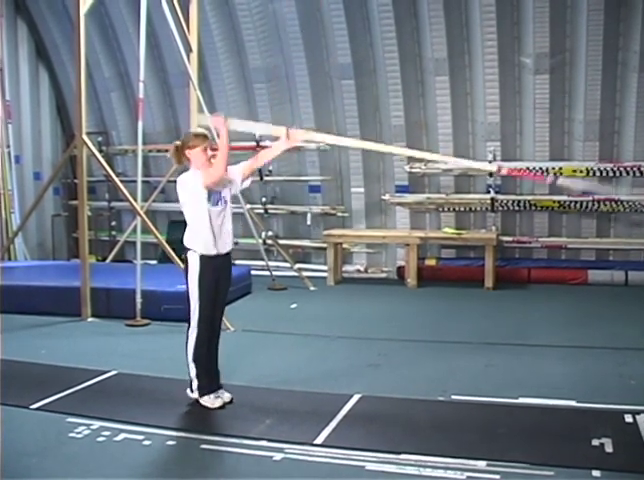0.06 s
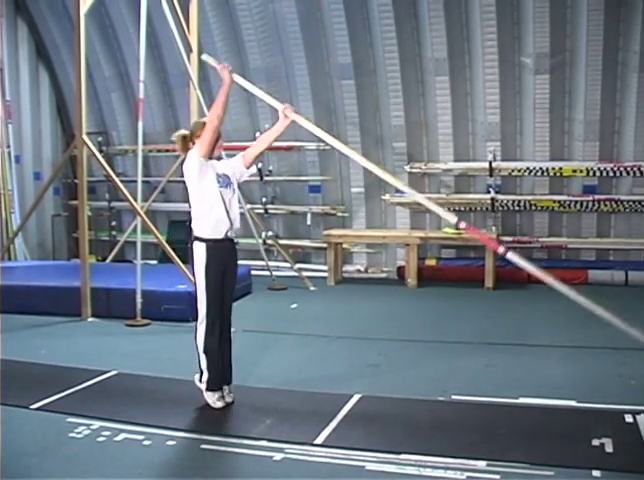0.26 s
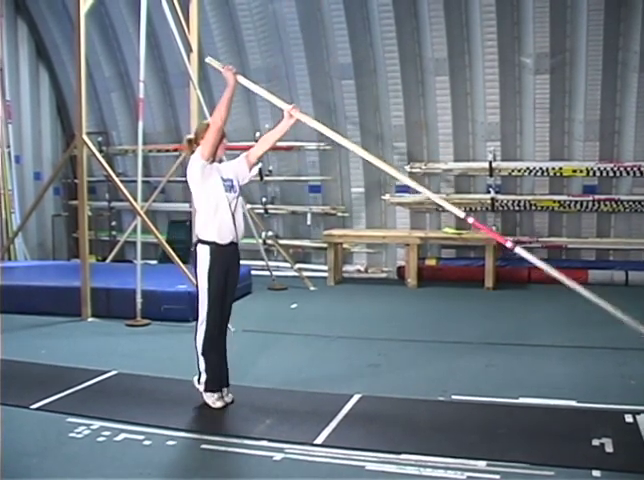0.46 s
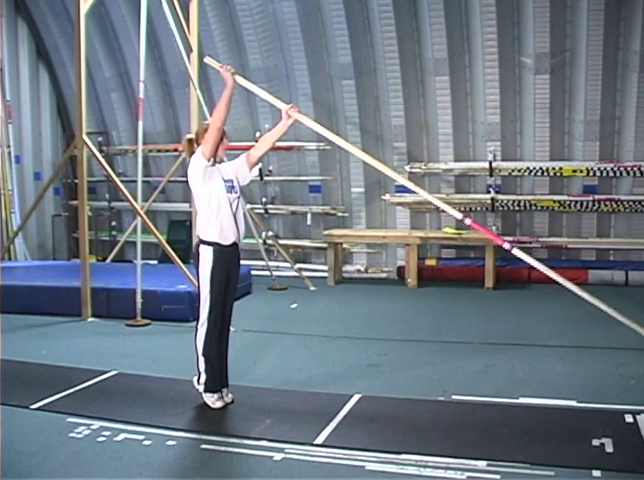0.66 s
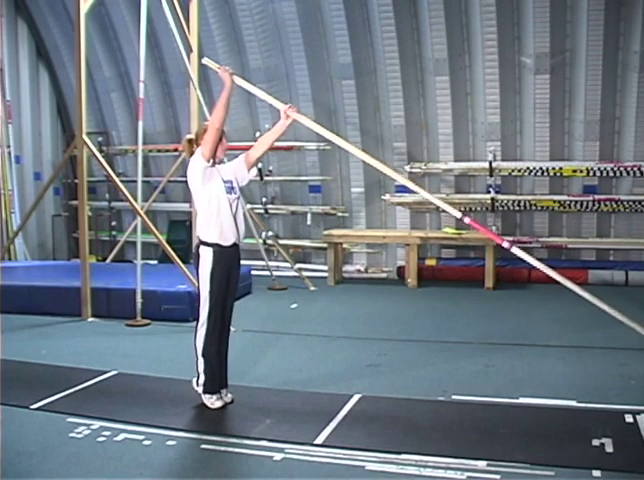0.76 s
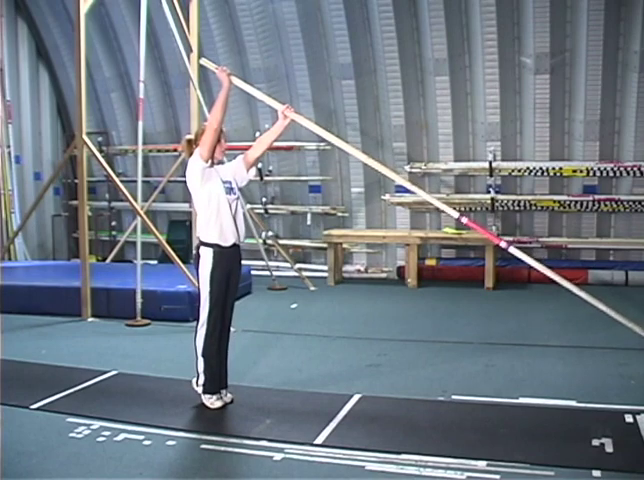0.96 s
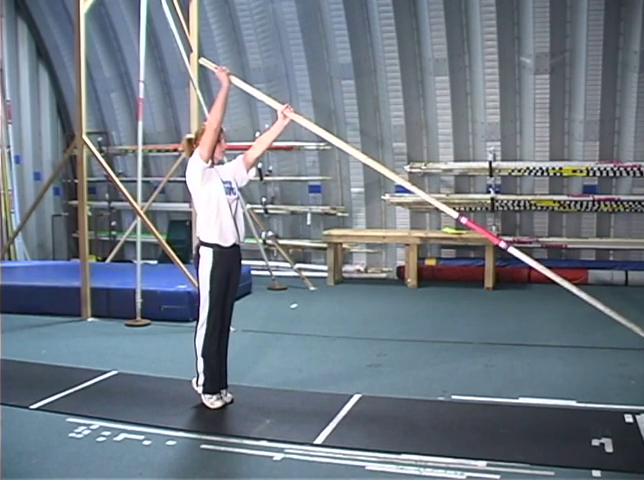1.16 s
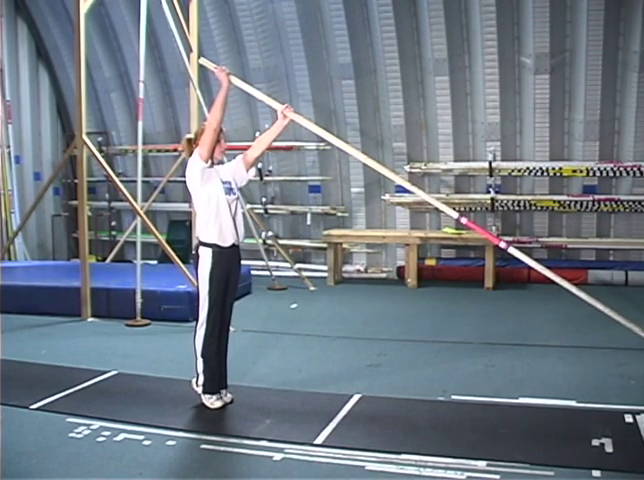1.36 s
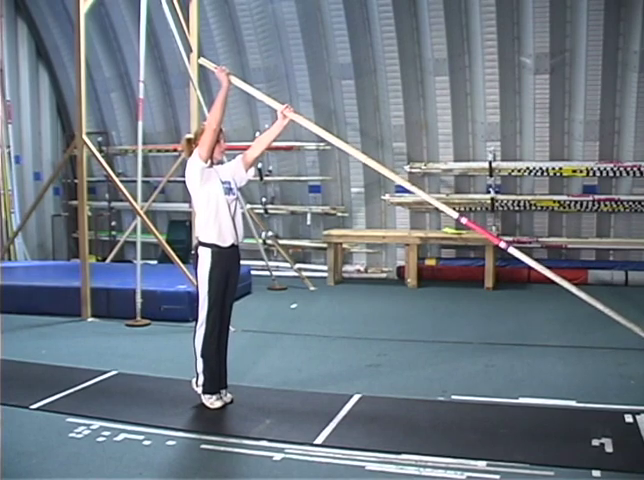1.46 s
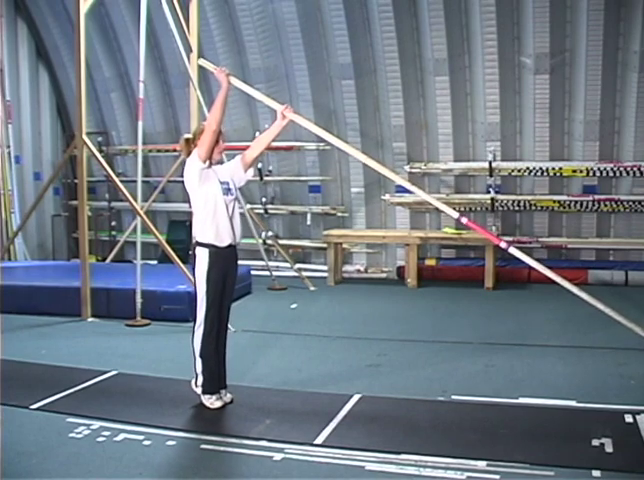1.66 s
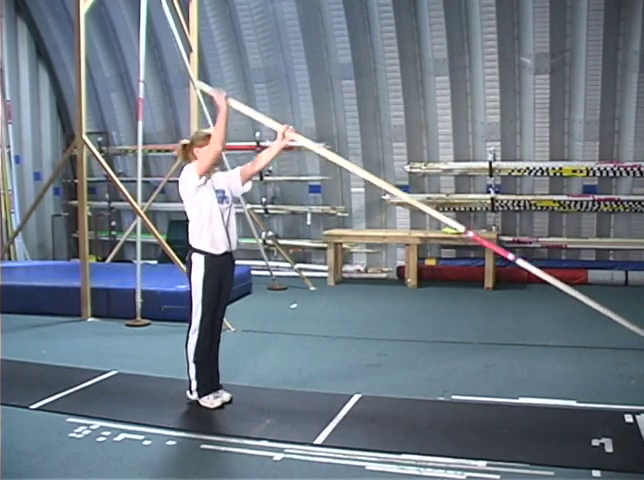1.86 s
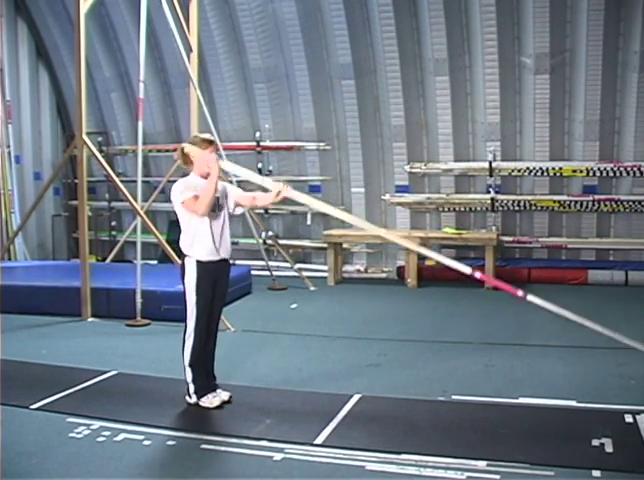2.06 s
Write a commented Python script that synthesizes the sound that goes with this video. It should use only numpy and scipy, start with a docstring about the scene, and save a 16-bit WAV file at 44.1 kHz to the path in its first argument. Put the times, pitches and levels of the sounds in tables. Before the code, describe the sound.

A vaulting pole slaps hard onto a runway, briefly overloading the microphone, and lands again more softly. Its ring fades through an echoing sports hall. Near the end come faint grip creaks and a light scrape.

```python
"""Faint rubbing, a creak and a soft footfall over the air of an arched sports hall: a long vaulting
pole is swung down. It slaps the runway and lands again, softer, after one bounce. Each blow is a
crack, a knock of the floor and the ring of the pole, and the hall rings on; the slap overloads the
microphone. At the end the pole is drawn back: it creaks and its tip scrapes over the floor."""
import sys
import numpy as np
from scipy import signal
from scipy.io import wavfile

SR = 44100
rng = np.random.default_rng(int(sys.argv[2]) if len(sys.argv) > 2 else 0)


def output_pcm(signal):
    """Save a mono or channel-first signal as 16-bit PCM at the path in sys.argv[1].

    Samples are clipped to [-1, 1] before scaling.
    """
    pcm = np.clip(np.atleast_2d(signal).T, -1, 1) * 32767
    wavfile.write(sys.argv[1], SR, np.round(pcm).astype(np.int16))


N = 92610
T = np.arange(N) / SR


def from_db(db):
    """Decibels to gain."""
    return 10 ** (np.asarray(db) / 20)


def rms_one(x):
    """Scale to unit rms."""
    return x / np.sqrt(np.mean(x ** 2) + 1e-20)


def at_hz(points, hz):
    """Read a table on a log-frequency axis."""
    points_hz, values = np.transpose(points)
    return np.interp(np.log(hz), np.log(points_hz), values)


def dying(t60_s):
    """Exponential decay from time zero."""
    return np.exp(-np.log(1000) * T / max(t60_s, 1e-4)) + 1e-18


def later(x, delay_s):
    """Delay a sound."""
    return np.concatenate([np.zeros(int(max(delay_s, 0) * SR)), x])[:N]


def lowpass(x, hz):
    """Second-order low-pass."""
    return signal.sosfilt(signal.butter(2, min(hz, .45 * SR), fs=SR, output="sos"), x + 1e-18)


def noise(low_hz, high_hz, order=2):
    """Band of noise, rms 1."""
    high_hz = min(high_hz, .45 * SR)
    low_hz = min(low_hz, .95 * high_hz)
    sos = signal.butter(order, [low_hz, high_hz], "band", fs=SR, output="sos")
    return rms_one(signal.sosfilt(sos, rng.standard_normal(N + SR // 4))[-N:])


def coloured(spectrum, t60s=None):
    """Third-octave noise bands on a spectrum, rms 1 at the start; t60s gives each band a decay."""
    edges_hz = 22 * 2 ** (np.arange(30) / 3)
    bands, power = 0, 0
    for low_hz, high_hz in zip(edges_hz, edges_hz[1:]):
        centre_hz = np.sqrt(low_hz * high_hz)
        gain = from_db(at_hz(spectrum, centre_hz)) * np.sqrt(high_hz - low_hz)
        decay = dying(at_hz(t60s, centre_hz)) if t60s else 1
        bands += gain * noise(low_hz, high_hz, order=3) * decay
        power += gain ** 2
    return bands / np.sqrt(power)


def struck(modes):
    """Decaying modes after one push."""
    return -sum(from_db(db) * np.sin(2 * np.pi * hz * T) * dying(t60_s) for hz, db, t60_s in modes)


# hall air: (frequency [Hz], relative density [dB])
AIR_SPECTRUM = [(25, 0.5), (45, 0.5), (90, -4), (170, -4.5), (420, -12), (620, -20), (760, -12.5),
                (1050, -28.5), (2000, -30), (3800, -30.5), (5800, -31.5), (10000, -33), (15500, -36.5)]


def hall_air(air_db=-57.5, hiss_db=-78, whine_db=-85, whine_hz=15732):
    """Steady air of the hall, with a narrow hiss and a very faint whine."""
    hiss = from_db(hiss_db) * noise(low_hz=4490, high_hz=4950)
    whine = from_db(whine_db) * np.sin(2 * np.pi * whine_hz * T)
    return from_db(air_db) * coloured(AIR_SPECTRUM) + hiss + whine


# friction envelope: (time [s], level [dB])
RUB_ENVELOPE = [(0, -66), (.06, -67.5), (.11, -66.5), (.16, -63.5), (.23, -77), (.4, -102), (1.68, -75),
                (1.8, -65), (1.91, -65.5), (1.98, -63.5), (2.1, -62)]
# friction colour: (frequency [Hz], relative density [dB])
RUB_SPECTRUM = [(300, -13), (620, -8), (880, 4.5), (1150, 0), (1650, 4.5), (2300, -2.5), (4000, -9),
                (7000, -10.5), (14000, -26)]


def rubbing(grain_db=2.5, grains_per_s=900):
    """Grainy friction of pole and clothes on the swing down and the draw back."""
    knots_s = np.arange(0, T[-1], 1 / grains_per_s)
    grain = from_db(grain_db * np.interp(T, knots_s, rng.standard_normal(N)[:len(knots_s)]))
    envelope = from_db(np.interp(T, *np.transpose(RUB_ENVELOPE)))
    return envelope * rms_one(coloured(RUB_SPECTRUM) * grain)


# slip runs: (start [s], length [s], slip rate [1/s], nominal peak [dB], low edge [Hz], high edge [Hz])
SLIP_RUNS = [(.0845, .04, 175, -52.5, 1190, 1915), (1.732, .035, 44, -51, 2780, 3700),
             (1.7805, .08, 97, -47, 890, 2050)]


def grip_creaks(spread_db=1.1, mid_run_db=-1, reverb_db=-41.5):
    """The pole sticks and slips in the grip; each slip rings a short resonance, faint in the hall."""
    ticks = 0
    for start_s, length_s, slips_per_s, peak_db, low_hz, high_hz in SLIP_RUNS:
        band = signal.butter(3, [low_hz, high_hz], "band", fs=SR, output="sos")
        tick = signal.sosfilt(band, signal.unit_impulse(N) + 1e-18)
        tick = tick / np.abs(tick).max()
        slips_s = np.arange(0, length_s, 1 / slips_per_s)
        slips_db = rng.normal(peak_db, spread_db, size=64)[:len(slips_s)]
        slips_db += mid_run_db * (np.sin(np.pi * slips_s / length_s) - .5)
        ticks += sum(from_db(db) * later(tick, start_s + s) for s, db in zip(slips_s, slips_db))
    return ticks + from_db(reverb_db) * signal.fftconvolve(ticks, hall_reverb())[:N]


# reverb colour: (frequency [Hz], relative density [dB])
REVERB_SPECTRUM = [(30, -27), (70, -15.5), (120, -7), (190, -2), (300, -2.5), (430, -1), (650, -10),
                   (1000, -16.5), (1600, -21), (2700, -18), (4100, -35.5), (7500, -39.5), (11000, -55),
                   (15000, -68)]
# reverb decay: (frequency [Hz], t60 [s])
REVERB_DECAY = [(60, 1.43), (150, 1.49), (400, 1.87), (900, 1.573), (2500, 1.18), (5000, 0.83),
                (10000, 0.58)]


def hall_reverb(build_s=.015):
    """Diffuse impulse response of the hall: builds up, then dies, treble first."""
    return coloured(REVERB_SPECTRUM, REVERB_DECAY) * (1 - np.exp(-T / build_s))


# footfalls: (time [s], level [dB])
FOOTFALLS = [(0.173, -59.5), (.184, -45.5), (1.12, -55), (1.27, -53.5), (1.91, -50), (2.004, -53)]


def footfalls(low_hz=60, high_hz=254, t60_s=0.19):
    """Dull thuds of weight shifting on the runway."""
    return sum(from_db(db) * later(noise(low_hz, high_hz) * dying(t60_s), s) for s, db in FOOTFALLS)


# floor knock, floor thump and pole modes: (frequency [Hz], relative level [dB], t60 [s])
KNOCK_MODES = [(373, 1.5, .026), (542, -15, 0.025), (847, -14.5, 0.045), (1470, -7.5, 0.0058)]
THUMP_MODES = [(70.5, -13, 0.11), (123.5, 3.5, 0.066), (262, -1, 0.11)]
POLE_MODES = [(138, -35.5, 2.1), (187.6, -21.5, 1.18), (194.8, -28, 0.58), (244, -24.5, 0.93),
              (346, -37, 0.39), (386.8, -28, 1.49), (459.6, -23, 0.53), (509, -29.5, 0.83),
              (681.4, -40.5, 1.1), (727.6, -39, 1.75), (943, -41, 0.42), (1177, -44, 1.1),
              (2104, -42.5, 0.3), (2400, -35, 0.5)]
# early echoes of the knock: (delay [s], gain [dB])
KNOCK_ECHOES = [(0.0124, -13), (0.017, -7.5), (0.0315, -13), (.0690, -9.5)]
# landings: (time [s], knock gain [dB], thump gain [dB], boom gain [dB], ring gain [dB],
# reverb send [dB], reverb cutoff [Hz])
LANDINGS = [(0.2281, -0.5, -23.5, -14, 0.5, -1.5, 11920), (0.5017, -13, -14, -19.5, -10.5, -13.5, 635)]


def pole_blows(contact_s=0.0011, thump_build_s=0.0057, boom_hz=192.8, boom_peak_s=0.027,
               boom_sharpness=6, reverb_db=-17.5, low_cut_hz=49):
    """Each blow knocks the floor, sets it booming, rings the pole and fills the hall."""
    knock = struck(KNOCK_MODES) * (1 - np.exp(-T / contact_s))
    echoes = sum(from_db(db) * later(knock, s) for s, db in KNOCK_ECHOES)
    knock = knock + lowpass(echoes, hz=680)
    thump = struck(THUMP_MODES) * (1 - np.exp(-T / thump_build_s))
    swell = (T / boom_peak_s * np.exp(1 - T / boom_peak_s)) ** boom_sharpness
    boom = -np.sin(2 * np.pi * boom_hz * T) * swell
    ring = struck(POLE_MODES)
    blows = 0
    for time_s, knock_db, thump_db, boom_db, ring_db, send_db, cutoff_hz in LANDINGS:
        floor = from_db(knock_db) * knock + from_db(thump_db) * thump + from_db(boom_db) * boom
        reverb = from_db(reverb_db + send_db) * lowpass(hall_reverb(), cutoff_hz)
        blows += later(floor + from_db(ring_db) * ring + reverb, time_s)
    return signal.sosfilt(signal.butter(1, low_cut_hz, "high", fs=SR, output="sos"), blows)


# crack bursts: (time [s], level [dB], low edge [Hz], high edge [Hz], t60 [s])
CRACK_BURSTS = [(0.2285, -20, 560, 9000, 0.0026), (0.2302, -33, 8800, 13700, 0.004),
                (0.2306, -15, 1000, 4160, 0.011), (0.2304, -21.5, 6100, 8740, 0.0067),
                (0.242, -40, 700, 10900, 0.054), (0.501, -42.5, 6300, 9400, 0.014),
                (0.5067, -26.5, 1830, 2400, 0.028), (0.514, -54.5, 6500, 12000, 0.067)]


def tip_cracks():
    """Short bright cracks and rattle of the tip, with an early echo of the slap."""
    return sum(from_db(db) * later(noise(low_hz, high_hz, order=3) * dying(t60_s), time_s)
               for time_s, db, low_hz, high_hz, t60_s in CRACK_BURSTS)


def scene():
    """All sources at one microphone, the same in both channels."""
    mono = pole_blows() + tip_cracks() + grip_creaks() + rubbing() + footfalls() + hall_air()
    return np.stack([mono, mono])


LIMIT_DB, ATTACK_S, RELEASE_DB_PER_S = -9, 0.006, 31.5
CLIP_LEVEL, CUTOFF_HZ = .51, 15800


def record(dry):
    """A limiter ducks after the slap and recovers slowly; what it misses clips, and the top is cut."""
    peak_db = 20 * np.log10(np.abs(dry).max(axis=0) + 1e-9)
    over_db = np.maximum(peak_db - LIMIT_DB, 0)
    held_db = np.maximum.accumulate(over_db + RELEASE_DB_PER_S * T) - RELEASE_DB_PER_S * T
    smoothing = np.exp(-1 / (ATTACK_S * SR))
    reduction_db = signal.lfilter([1 - smoothing], [1, -smoothing], held_db)
    clipped = np.clip(dry * from_db(-reduction_db), -CLIP_LEVEL, CLIP_LEVEL)
    return signal.sosfilt(signal.ellip(10, .1, 80, CUTOFF_HZ, fs=SR, output="sos"), clipped)


dry = scene()
out = record(dry)
output_pcm(out)
```